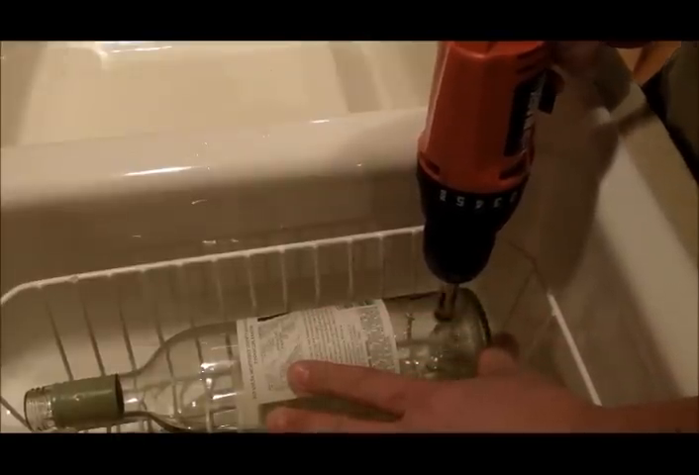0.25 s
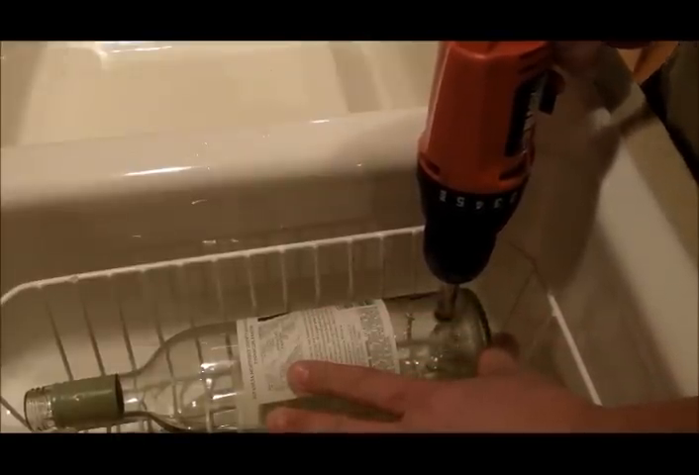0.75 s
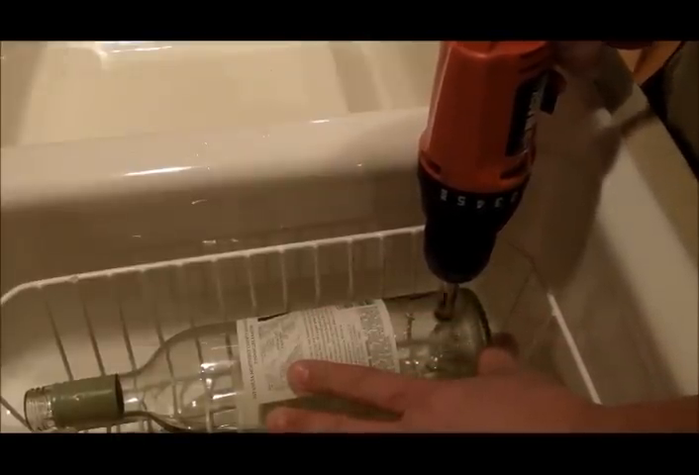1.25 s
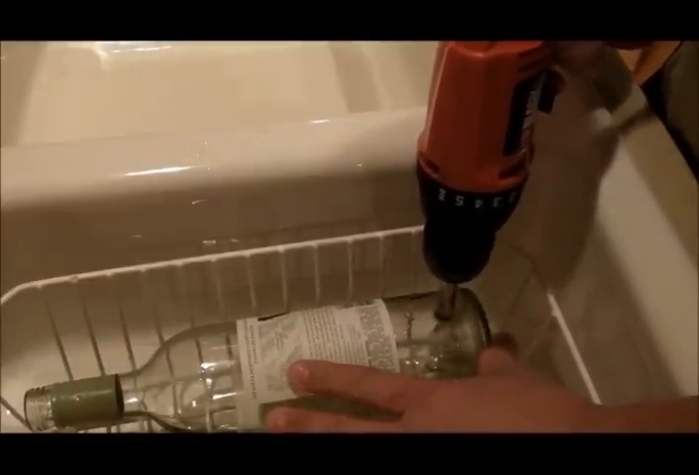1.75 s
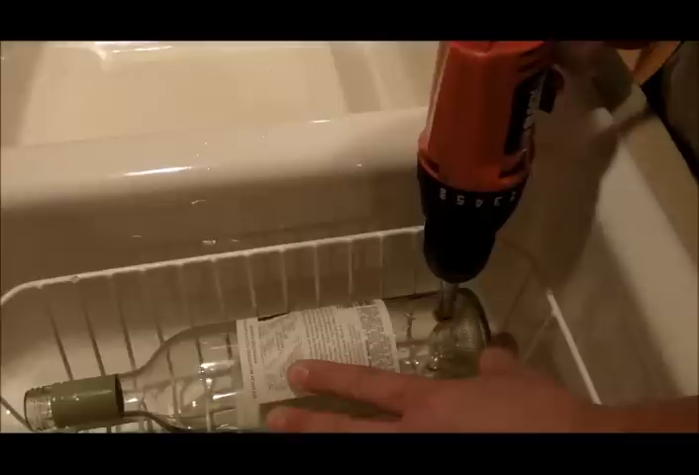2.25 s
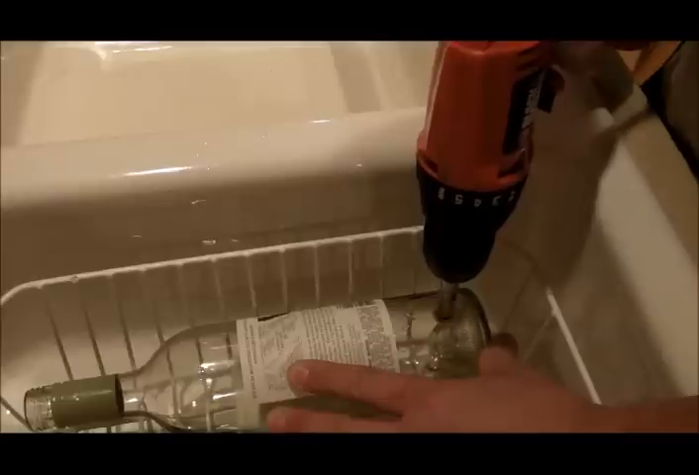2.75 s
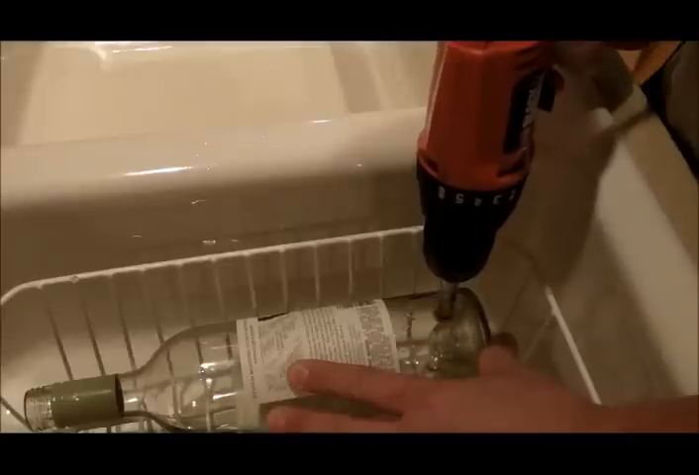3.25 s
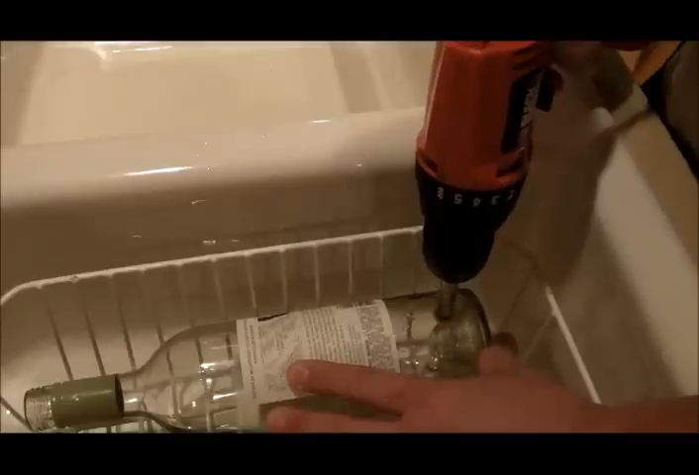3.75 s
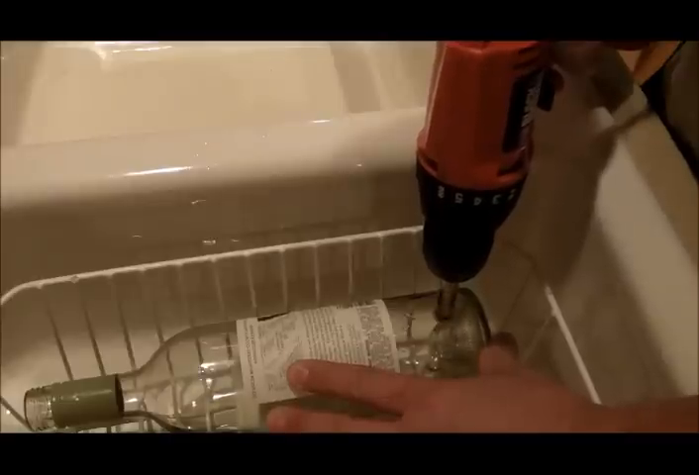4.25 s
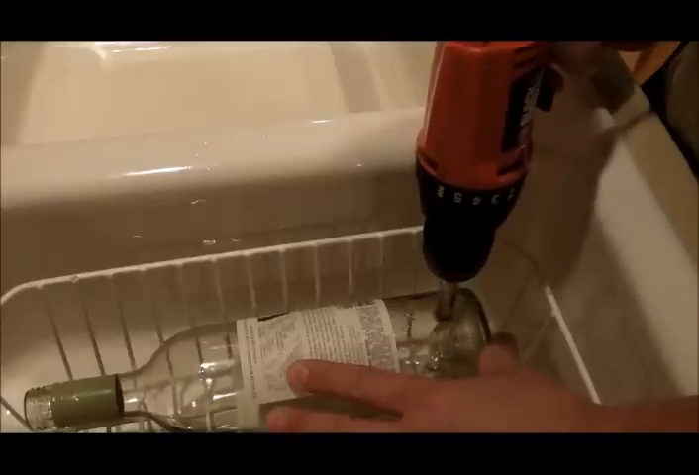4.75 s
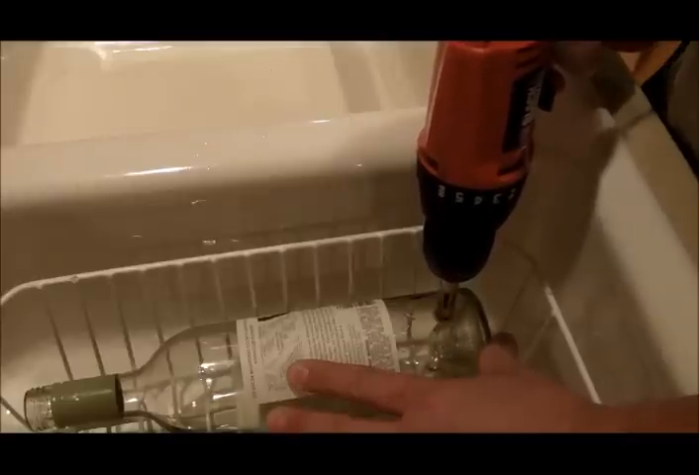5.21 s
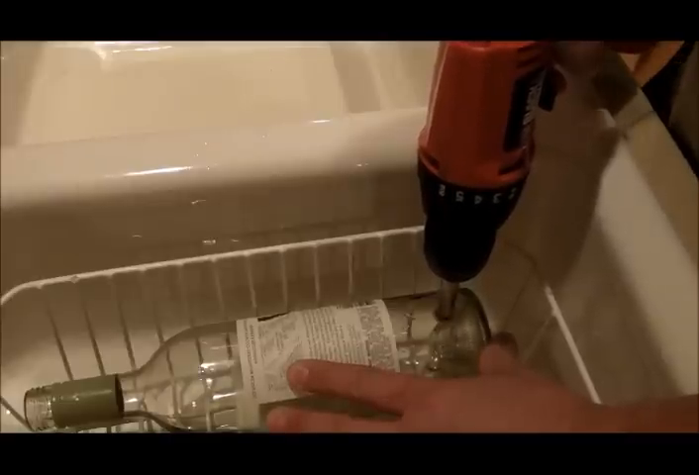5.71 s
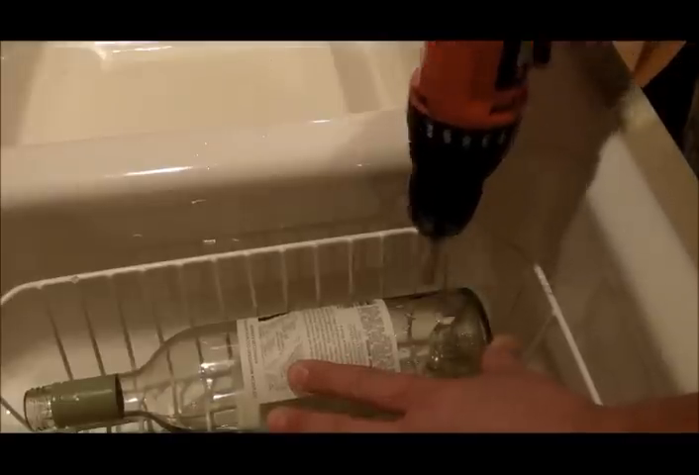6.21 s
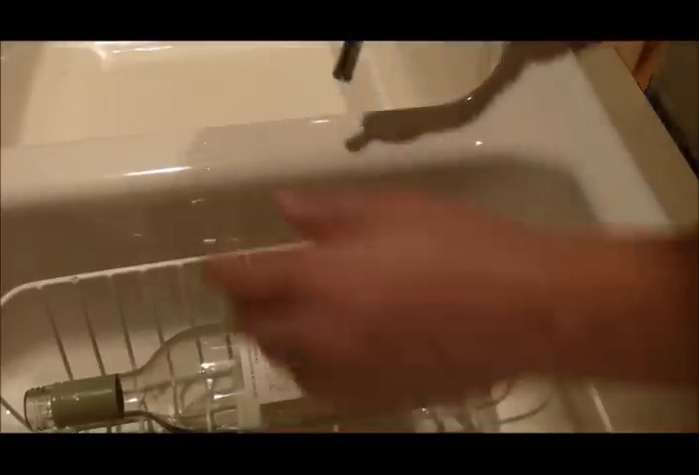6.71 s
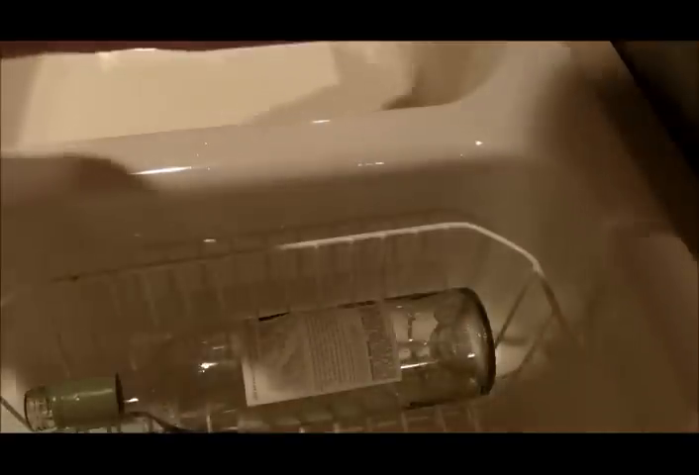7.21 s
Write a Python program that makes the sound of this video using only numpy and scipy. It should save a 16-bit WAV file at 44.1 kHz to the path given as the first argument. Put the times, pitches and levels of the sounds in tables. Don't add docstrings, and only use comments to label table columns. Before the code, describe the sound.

Close in a kitchen sink, a cordless drill scrapes a gritty core bit against a wet glass bottle: bright, rough, hissing grind with glassy ringing, a thin motor whine and a wobble five times a second. Near six seconds it stops, gears rumble down, small ticks follow in quiet, then a tap handle knocks and water begins spraying at the very end.

```python
import sys
import numpy as np
from scipy import signal
from scipy.fft import rfft, irfft, next_fast_len
from scipy.io import wavfile
from scipy.ndimage import uniform_filter1d, map_coordinates

SR = 44100
rng = np.random.default_rng(int(sys.argv[2]) if len(sys.argv) > 2 else 0)


def invert_db(x):
    u = np.asarray(x, float) / 20
    return 10 ** u


def wav_record(signal):
    frames = np.transpose(np.atleast_2d(signal))
    bounded = np.clip(frames, -1, 1)
    quanta = np.round(bounded * 32767).astype(np.int16)
    wavfile.write(sys.argv[1], SR, quanta)


N = 329427


def unit(x):
    return x / np.sqrt(np.mean(x ** 2) + 1e-20)


def along(points, hz):
    f, v = np.transpose(points)
    return np.interp(np.log(hz + 1), np.log(f + 1), v)


def curves(rows, edge_s=.015):
    s, *cols = np.transpose(rows)
    t = np.arange(N) / SR
    opening = np.clip((t - s[0]) / edge_s + (s[0] <= 0), 0, 1)
    closing = np.clip((s[-1] - t) / edge_s + 1, 0, 1)
    return [np.interp(t, s, c) for c in cols] + [opening * closing]


def wobble(rate_hz):
    knots = rng.standard_normal(int(N * rate_hz / SR) + 4)
    return map_coordinates(knots, [np.arange(N) * rate_hz / SR])


def filtered(x, response):
    m = next_fast_len(N + SR // 2)
    return irfft(rfft(x, m) * response(np.fft.rfftfreq(m, 1 / SR)), m)[..., :N]


def bell(f, hz, width_hz):
    return 1j * f * width_hz / (hz * hz - f * f + 1j * f * width_hz + 1e-9)


def modes(table):
    return lambda f: sum((-1) ** k * invert_db(db) * bell(f, hz, width) for k, (hz, width, db) in enumerate(table))


def pair(side_db, patchy_db, grainy_db):
    z = signal.stft(rng.standard_normal((2, N)), nperseg=512)[2]
    field = uniform_filter1d(rng.standard_normal(z.shape[1:]), size=6, axis=0)
    field = uniform_filter1d(field, size=8, axis=1)
    two = signal.istft(z * invert_db(patchy_db * unit(field)), nperseg=512)[1][:, :N]
    two = two * invert_db(grainy_db * wobble(900))
    mid = two[0]
    side = filtered(two[1], lambda f: invert_db(along(side_db, f)))
    return np.array([mid + side, mid - side])


def tone(hz, db, blur_hz, flutter_db):
    phase = 2 * np.pi * np.cumsum(hz + blur_hz * wobble(30)) / SR
    return np.sqrt(2) * invert_db(db + flutter_db * wobble(11)) * np.sin(phase)


# level_db, carrier_swing_db, drift_db, eased_trigger_db, echo_t60_s
GRIT_BANDS = [
    (-28, 0.05, .5, -1.5, 0.46),
    (-33, -0.1, .5, -0.5, .3),
    (-26.5, .5, .4, -3, 0.49),
    (-26.5, 0.94, .7, -4.5, 0.38),
]
SPLITS_HZ = (2250, 2850, 7600)
# freq_hz, density_db_per_hz
SCRATCH_COLOUR = [(24, -72.5), (40, -37.5), (162, -17), (255, -18.5), (500, -3.5), (805, -9.5), (868, -8),
                  (1290, -0.5), (2250, -10.5), (2540, -15.5), (2810, -10), (5960, -4.5), (6920, -10.5),
                  (11700, -8.5), (15800, -8.5)]
# freq_hz, width_hz, level_db
BOTTLE_MODES = [(252, 100, -6), (500, 90, -1.5), (1106, 126, 6.5), (1442, 114, 7), (1933, 32, 5.5),
                (2503, 180, 9.5), (3304, 41, 6), (4050, 170, 0), (5446, 38, 6.5), (7050, 400, -6),
                (7970, 380, -5), (9110, 150, 8.5), (9440, 86, -10), (10800, 250, 6), (11870, 350, 6.5),
                (15550, 350, -13)]
# freq_hz, width_hz, level_db
WALL_MODES = [(1250, 16, 6.5), (2265, 110, -9), (2290, 70, -6), (2487, 28, 11), (2560, 80, 4),
              (2750, 130, -5.5), (3043, 22, 10), (4686, 40, 4.5), (5033, 55, 5), (5850, 36, 6),
              (6111, 40, 8), (9998, 40, 5.5)]
# freq_hz, side_minus_mid_db
SCRATCH_SPREAD = [(30, -16.5), (60, -4.5), (99, -10), (160, -9), (270, -16), (450, -13.5), (740, -13),
                  (1220, -17.5), (2010, -14), (3330, -7.5), (5500, -7), (9080, -4.5), (15000, -6)]
# freq_hz, left_minus_right_db
SCRATCH_LEAN = [(60, 0), (150, 2), (380, 0.0), (950, 0.0), (2380, 0.5), (5980, 2), (15000, -2.5)]
# start_s, duller_housing_share
TRIGGER_SLACK = [(0, 0.064), (.5, 0.063), (.75, 0.018), (5.72, 0.03), (5.9, 0.47), (6.0, 1.5), (6.22, 0.91)]
CARRIER_RATIO, CARRIER_PEAK_TURN = 3 / 5, .95
LIFT_S, LIFT_T60_S, ECHO_DB = 5.977, .075, -17


def grinding():
    def glass(f):
        return np.prod([1 + (invert_db(db) - 1) * bell(f, hz, width)
                        for hz, width, db in BOTTLE_MODES + WALL_MODES], axis=0)

    def ears(f):
        return invert_db(along(SCRATCH_COLOUR, f) + np.outer([.5, -.5], along(SCRATCH_LEAN, f)))

    grit = rim_scrapes(pair(SCRATCH_SPREAD, patchy_db=0.81, grainy_db=1.0))
    scratch = filtered(grit, lambda f: glass(f) * ears(f))
    above = [filtered(scratch, lambda f: 1 / (1 + (hz / (f + 1)) ** 20)) for hz in SPLITS_HZ]
    body = scratch - above[0]
    duller = filtered(body, lambda f: 0.81 * bell(f, 840, 320) - .5 * bell(f, 1560, 590))
    slack = curves(TRIGGER_SLACK)[0]
    parts = body + slack * duller, above[0] - above[1], above[1] - above[2], above[2]

    chatter_db = 1.5 * wobble(22.05)
    chatter_shares = (.1, 0.19, 0.46, 0.73)
    carrier = np.cos(2 * np.pi * (CARRIER_RATIO * turns() - CARRIER_PEAK_TURN))
    after_s = np.maximum(np.arange(N) / SR - LIFT_S, 0)
    hand = wobble(6)
    out = 0
    for (db, swing_db, drift_db, eased_db, t60_s), share, part in zip(GRIT_BANDS, chatter_shares, parts):
        level_db = db + swing_db * carrier + share * chatter_db
        level_db = level_db + drift_db * (1.2 * hand + 0.44 * wobble(7))
        level_db = level_db + eased_db * np.clip(slack, 0, 1)
        fade = np.maximum(invert_db(-60 * after_s / LIFT_T60_S), invert_db(ECHO_DB - 60 * after_s / t60_s))
        out = out + invert_db(level_db) * fade * unit(part)
    return out


# place_turns, length_turns, centre_hz, width_hz, level_db
RIM_SPOTS = [(.7, .1, 7600, 300, 4.5), (.72, .08, 6150, 250, 3.5), (.92, .06, 5750, 300, 4),
             (.0, .06, 5350, 250, 4.5), (.08, .06, 4930, 250, 9.5), (.1, .07, 4200, 350, 2),
             (.56, .09, 3600, 600, 4), (.22, .09, 10400, 750, 5.5), (.6, .08, 2400, 500, 2),
             (.55, .15, 1200, 500, 1.5), (.2, .1, 14600, 350, 3.5), (.65, .07, 12600, 700, 2.5),
             (.9, .1, 4300, 600, -3), (.45, .12, 6900, 250, 2.5), (.92, .07, 7800, 700, 2.5)]


def rim_scrapes(x):
    f, t, z = signal.stft(x, SR, nperseg=256)
    turn = np.interp(t, np.arange(N) / SR, turns())
    field = np.zeros(z.shape[1:])
    for place, length, hz, width_hz, db in RIM_SPOTS:
        nearest = np.round(turn - place)
        strength = 1 + .15 * rng.standard_normal(64)[nearest.astype(int)]
        passing = np.exp(-((turn - place - nearest) / length) ** 2)
        field += db * np.outer(np.exp(-((f - hz) / width_hz) ** 2), strength * passing)
    field *= np.interp(t, [0, 2], [.55, 1])
    return signal.istft(z * invert_db(field - field.mean(1, keepdims=True)), SR, nperseg=256)[1][:, :N]


# start_s, commutator_hz
MOTOR_SPEED = [(0, 762.5), (.3, 760.3), (.5, 769.3), (.7, 800.8), (.95, 817), (1.4, 828), (2, 818),
               (2.45, 809.7), (2.7, 803.4), (3.4, 806.2), (4, 807.2), (4.3, 802.9), (4.8, 810.2),
               (5.2, 800.4), (5.45, 802.8), (5.7, 801.8), (5.88, 784.2), (5.98, 783.6)]
# [(commutator_hz, level_db)]
MOTOR_ORDERS = [(1, 1.1, [(761, -67), (772, -46), (795, -40.5), (810, -42), (816, -53), (826, -62)]),
                (2, 1.5, [(761, -52), (785, -45), (803, -42), (815, -42.5), (826, -41)]),
                (8, 3, [(785, -58), (803, -49), (815, -56)]), (9, 3, [(761, -63), (785, -56), (803, -49.5),
                (813, -43.5), (826, -48)]), (12, 3, [(761, -46), (785, -50), (800, -42.5), (810, -44),
                (817, -52), (828, -50)]), (1 / 5, .4, [(801, -67), (812, -62.5), (828, -55)])]
# multiple, level_db
SHAFT_TONES = [(.26, -76), (.362, -63.5)]
# start_s, pitch_hz, level_db
CONTROLLER_BEAT = [(0, 10745, -58), (1.05, 10730, -55), (1.2, 10770, -42), (1.5, 10765, -42),
                   (1.85, 10715, -48), (2.5, 10790, -50), (3.9, 10830, -48), (4.25, 10775, -45),
                   (5.0, 10840, -45), (5.8, 10850, -55)]
# start_s, pitch_hz, level_db
SWITCHING_WHINE = [(0, 9256, -52), (.4, 9272, -52), (.6, 9312, -51), (2, 9328, -50), (4, 9333, -49),
                   (5.7, 9334, -49), (5.95, 9331, -60)]
SAG_HZ, SAG_TURN = 3.2, .05
WIND_DOWN_DB = -15


def motor():
    hz, gate = curves(MOTOR_SPEED)
    ripple_hz = SAG_HZ * np.cos(2 * np.pi * (turns() - SAG_TURN))
    whine = sum(tone(k * (hz + ripple_hz), along(heard, hz), blur_hz, flutter_db=1.7)
                for k, blur_hz, heard in MOTOR_ORDERS)
    whine *= invert_db(WIND_DOWN_DB * np.clip(curves(TRIGGER_SLACK)[0] - .6, 0, 1))
    whine += sum(tone(k * hz, db, blur_hz=0.54, flutter_db=2.5) for k, db in SHAFT_TONES)
    beat_hz, beat_db, _ = curves(CONTROLLER_BEAT)
    whine += tone(beat_hz + 7 * ripple_hz, beat_db, blur_hz=4, flutter_db=2)
    switch_hz, switch_db, _ = curves(SWITCHING_WHINE)
    whine += tone(switch_hz, switch_db + 2.0, blur_hz=2.5, flutter_db=1.5)
    return gate * whine


TURN_RATIO = 160.6


def turns():
    return np.cumsum(curves(MOTOR_SPEED)[0]) / SR / TURN_RATIO - .08


# start_s, boom_db
COAST_DOWN = [(5.98, -43), (6.05, -49), (6.15, -58), (6.35, -56.5), (6.45, -57), (6.55, -60.5),
              (6.65, -62.5), (6.86, -63), (6.9, -76)]
# freq_hz, density_db_per_hz
BOOM_COLOUR = [(29, -30), (50, -15), (81, -11.5), (251, -28), (352, -0.5), (493, -3), (583, -9.5),
               (1120, -21), (1810, -13), (1940, -28), (2140, -9), (2930, -21), (14500, -29.5), (15500, -45)]
# freq_hz, width_hz, level_db
RATTLE_MODES = [(1810, 65, -5), (2170, 140, -0.5), (2760, 63, -4), (4000, 91, -5), (4870, 260, -7),
                (6300, 37, -2.5)]
# start_s, boom_db, rattle_db
SINK_JOLTS = [(7.11, -63, -64), (7.265, -55, -68), (7.35, -55.5, -72)]
JOLT_RISE_S, JOLT_T60_S = 0.019, .2
RATTLE_DB, RATTLE_FOLLOWS = -42.5, 0.52
CATCH_S, CATCH_LASTS_S, CATCH_DB = 6.38, .07, 8


def coasting():
    boom_db, gate = curves(COAST_DOWN)
    t = np.arange(N) / SR
    catch_db = CATCH_DB * np.exp(-((t - CATCH_S) / CATCH_LASTS_S) ** 2)
    rattle_db = RATTLE_DB + RATTLE_FOLLOWS * boom_db + catch_db

    def jolt(s):
        rise = np.exp(-((t - s) / JOLT_RISE_S) ** 2)
        return np.where(t < s, rise, invert_db(-60 * np.abs(t - s) / JOLT_T60_S))

    boom = filtered(pair([(400, -17.0), (5000, -14.0)], patchy_db=-0.5, grainy_db=0.0),
                    lambda f: invert_db(along(BOOM_COLOUR, f)) * (1 + 0.96 * bell(f, 405, 70)))
    rattle = filtered(pair([(2000, -8)], patchy_db=2.5, grainy_db=0.0), modes(RATTLE_MODES))
    boom_gain = gate * invert_db(boom_db) + sum(invert_db(db) * jolt(s) for s, db, _ in SINK_JOLTS)
    rattle_gain = gate * invert_db(rattle_db) + sum(invert_db(db) * jolt(s) for s, _, db in SINK_JOLTS)
    return boom_gain * unit(boom) + rattle_gain * unit(rattle)


# start_s, peak_db, centre_hz, width_hz, t60_s
TICKS = [(5.93, -46, 110, 70, .3), (5.99, -53, 190, 150, 0.66), (5.99, -37, 2520, 40, 0.24),
         (6.055, -44, 3040, 60, .16), (6.056, -36, 11300, 1800, 0.053), (6.055, -40.5, 3320, 500, 0.12),
         (6.696, -51.5, 4000, 6000, .015), (6.9538, -46, 2600, 500, 0.046),
         (7.1147, -45, 6300, 5000, 0.044), (7.141, -39, 4000, 5000, .02), (7.1404, -44, 1500, 2000, .025),
         (7.1816, -50, 2400, 1500, .02), (7.228, -53, 11000, 5000, .03), (7.254, -51, 650, 450, .12),
         (7.2614, -46, 5060, 800, .03), (7.2729, -46, 4600, 1200, .03), (7.2735, -50, 1750, 600, .04),
         (7.334, -48, 600, 900, 0.15)]
# start_s, peak_db, pitch_hz, t60_s
HANDLE_KNOCKS = [(7.237, -38, 435, 0.048), (7.334, -46, 175, .07)]


def contacts():
    out = np.zeros(N + SR)
    t = np.arange(SR // 5) / SR
    f = np.fft.rfftfreq(len(t), 1 / SR)
    for s, db, hz, width_hz, t60_s in TICKS:
        burst = irfft(rfft(rng.standard_normal(len(t))) * bell(f, hz, width_hz) ** 2, len(t))
        out[round(s * SR):][:len(t)] += invert_db(db - 7 - 60 * t / t60_s) * unit(burst)
    soft_start = 1 - np.exp(-(t / 0.0043) ** 2)
    for s, db, hz, t60_s in HANDLE_KNOCKS:
        ring = soft_start * np.sin(2 * np.pi * hz * t)
        out[round(s * SR):][:len(t)] += invert_db(db + 4 - 60 * t / t60_s) * ring
    return out[:N]


# start_s, level_db
WATER_LEVEL = [(7.3, -80), (7.348, -47), (7.368, -52), (7.408, -35.5), (7.47, -32.5)]
# freq_hz, density_db_per_hz
SPRAY_COLOUR = [(59, -40), (100, -10), (219, -17), (321, -12), (732, -8), (1140, -13), (2110, -3),
                (2670, -7), (5140, -3.5), (13100, -6), (15800, -6)]


def tap():
    db, gate = curves(WATER_LEVEL)
    spray = filtered(pair([(500, -19.0), (8000, -1.0)], patchy_db=2.5, grainy_db=0.5),
                     lambda f: invert_db(along(SPRAY_COLOUR, f)))
    return gate * invert_db(db) * unit(spray)


def kitchen(x):
    t = np.arange(SR // 3) / SR
    tail = rng.standard_normal((2, len(t))) * invert_db(-60 * t / 0.54)
    return signal.fftconvolve(x[None], tail / np.linalg.norm(tail[0]), axes=1)[:, :N]


# freq_hz, density_db_per_hz
AIR_COLOUR = [(18, -47), (30, -13.5), (130, -2.5), (264, -13), (424, 0), (612, -10.5), (1890, -11),
              (7200, -18), (13200, -16), (15450, -21), (15650, -37)]


def room_tone():
    air = filtered(pair([(200, -8), (4000, -0.5)], patchy_db=1.2, grainy_db=0.0),
                   lambda f: invert_db(along(AIR_COLOUR, f)))
    return invert_db(-64.0) * unit(air)


def scene():
    near = motor() + contacts()
    return near + invert_db(-8.5) * kitchen(near) + grinding() + coasting() + tap() + room_tone()


def low_pass(x):
    return signal.sosfilt(signal.butter(12, 15790, fs=SR, output="sos"), x)


TOP_HZ, EDGE_HZ = 15800, 90


def record(dry):
    mix = filtered(dry, lambda f: np.clip((TOP_HZ - f) / EDGE_HZ, 0, 1) ** 2)
    return low_pass(mix)


dry = scene()
out = record(dry)
wav_record(out)
```